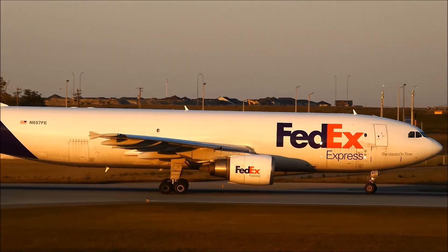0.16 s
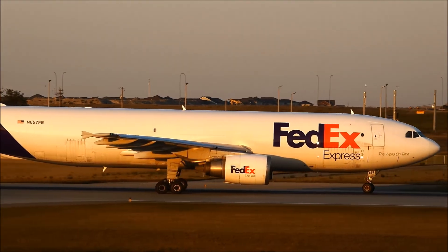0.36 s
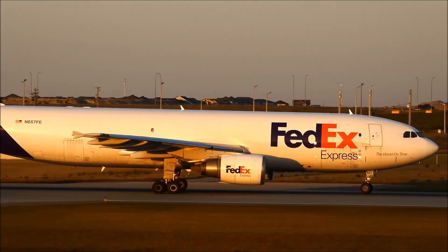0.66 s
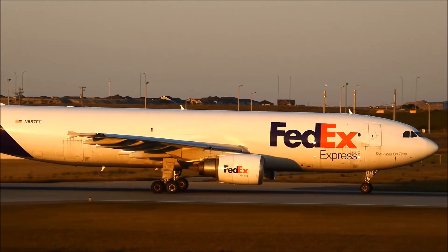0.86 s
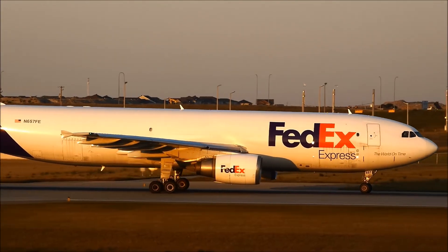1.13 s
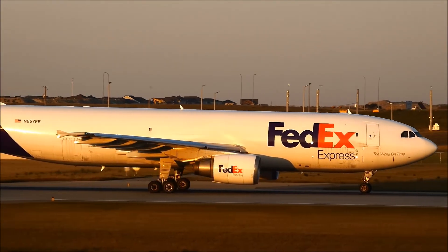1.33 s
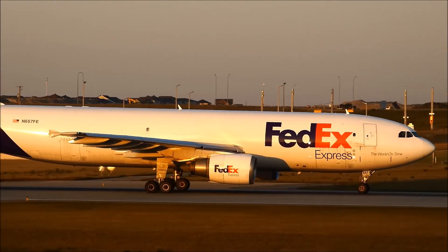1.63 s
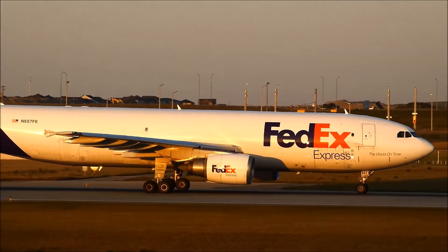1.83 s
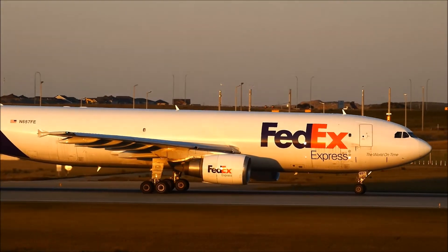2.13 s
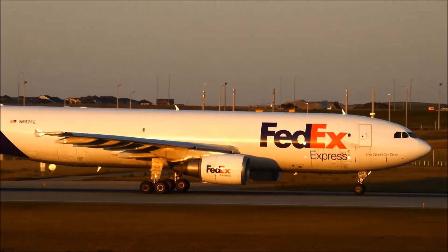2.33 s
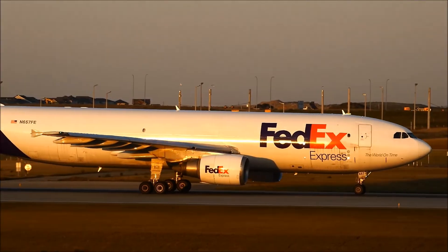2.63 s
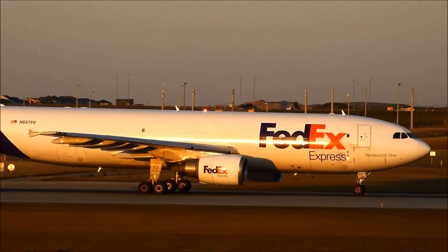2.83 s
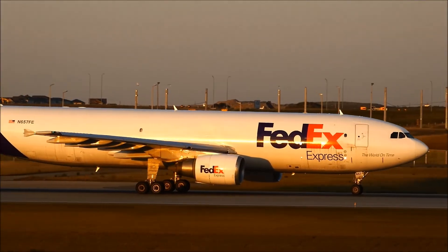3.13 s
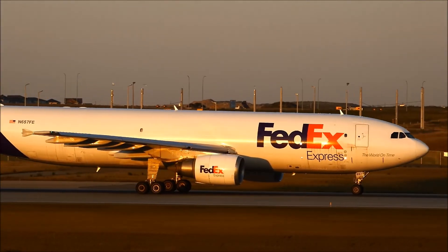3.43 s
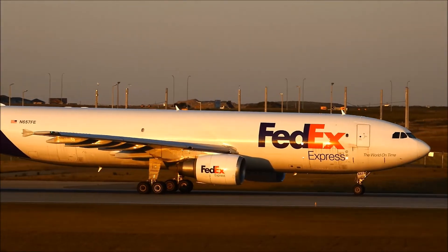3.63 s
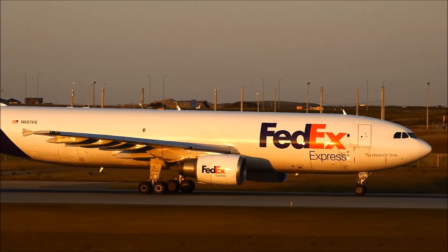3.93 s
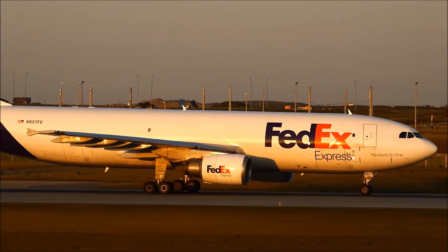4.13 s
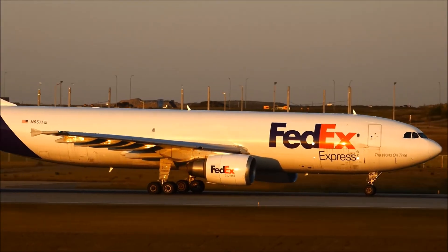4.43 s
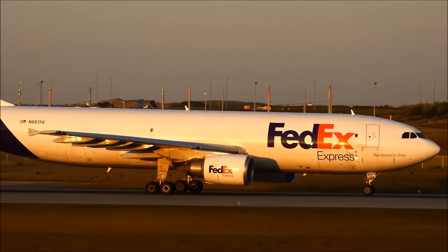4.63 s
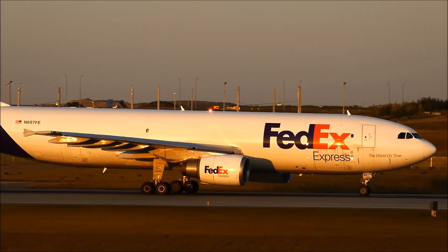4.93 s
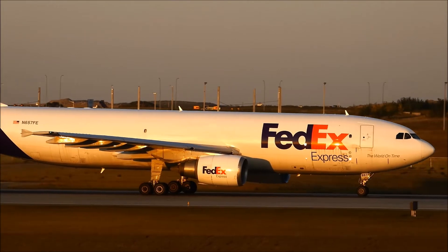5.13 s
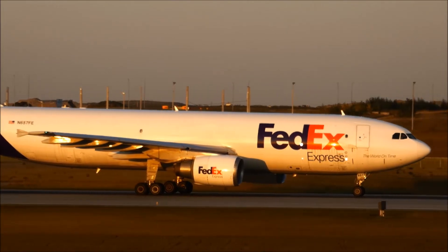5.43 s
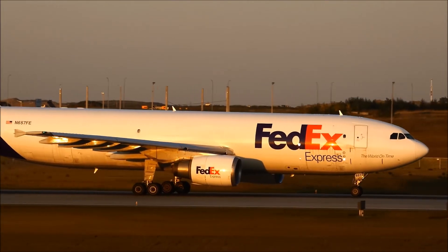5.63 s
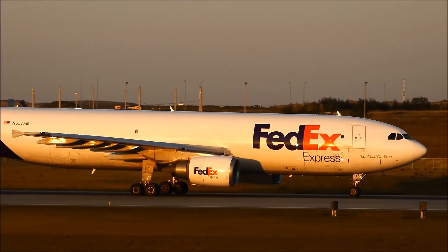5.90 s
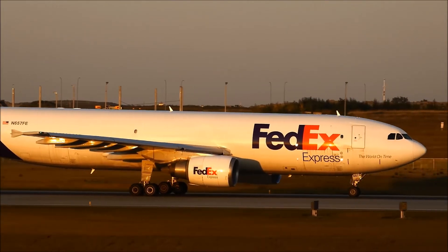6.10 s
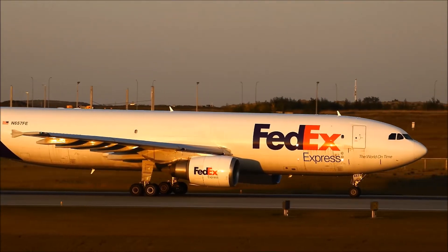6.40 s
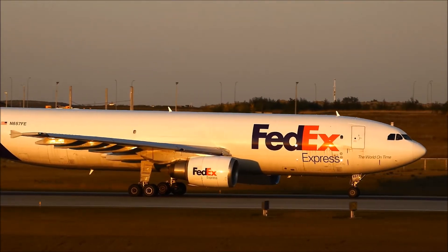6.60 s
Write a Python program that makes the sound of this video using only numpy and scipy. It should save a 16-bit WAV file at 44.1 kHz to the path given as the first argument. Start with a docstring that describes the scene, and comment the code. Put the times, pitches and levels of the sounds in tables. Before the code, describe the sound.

Across an open grass field, a large jet rolls along with a low trembling howl over steady exhaust roar and airy intake rush. The howl dips and swells, and the rush and fan hiss build through the middle. Near the end the pitch jumps up and keeps climbing with thin rising whines. Very faint crickets trill close to the stereo microphone, then hush.

```python
"""The low combustor howl of a large twin-engined jet, far across a grass field at dusk, drifts and then climbs.
The howl is a trembling sine; thin glides mark an engine gaining speed. Under it lie exhaust roar, intake rush
and fan hiss: noise shaped by spectra dulled by distance, which change colour as the jet rolls past.
Near the microphone bush crickets trill in pulsed treble noise and dry rustles tick.
A deep murmur from afar and quiet evening air, both steady noise, fill the background."""
import sys
import numpy as np
from scipy import signal
from scipy.fft import rfft, irfft, next_fast_len
from scipy.io import wavfile
from scipy.ndimage import uniform_filter1d, map_coordinates

SR = 44100
rng = np.random.default_rng(int(sys.argv[2]) if len(sys.argv) > 2 else 0)


def waveform_to_disk(signal):
    """Save audio, clipped to [-1, 1], as 16-bit WAV at the path in sys.argv[1]."""
    frames = np.transpose(np.atleast_2d(signal))
    scaled = np.clip(frames, -1, 1) * 32767
    samples = np.round(scaled).astype(np.int16)
    wavfile.write(sys.argv[1], SR, samples)


N = 298097

# Spectra give the colour only; their sound is scaled to rms 1 before its level is set.
# Deep murmur from afar. Each row: frequency in Hz, relative level in dB per Hz.
MURMUR_SPECTRUM = [(10, -120), (25, -19), (45, -13.5), (70, -3), (110, -12.5), (160, -120)]
# Quiet evening air over the field. Each row: frequency in Hz, relative level in dB per Hz.
AIR_SPECTRUM = [(4000, -120), (4900, -13.5), (5300, -1.5), (6000, -1), (8300, -2.5), (9500, 1),
                (11000, -0.5), (13000, -8), (15000, -10.5), (16000, -19)]

# Far cricket chorus. Each row: frequency in Hz, relative level in dB per Hz.
CHORUS_SPECTRUM = [(7500, -120), (8400, -14), (8900, -5), (9600, 0), (10400, -1), (11200, -4), (12000, -10),
                   (13000, -5), (14200, -11), (15000, -13), (16000, -40)]
# Cricket singing near the microphone. Each row: frequency in Hz, relative level in dB per Hz.
SINGER_SPECTRUM = [(8500, -120), (9400, -16), (9700, -9), (10100, -10), (10900, -2), (11400, -4),
                   (11950, -18), (12400, -4), (12800, -1), (13500, 0), (14150, -16), (14600, -11),
                   (15100, -10), (15600, -30)]
# Near singer over time, before flutter and left-right balance. Each row: time in seconds, level in dB.
SINGER_LEVEL = [(0, -85.5), (1.05, -81), (1.4, -70), (1.8, -72), (2.3, -67.5), (2.8, -72.5), (3.2, -69.5),
                (3.6, -69), (4.2, -64), (4.41, -67.5), (4.75, -62), (5.2, -66), (6.1, -69), (6.14, -86.5),
                (6.76, -87)]
# Stereo width of the crickets. Each row: frequency in Hz, left-right likeness from -1 to 1.
INSECT_LIKENESS = [(9000, .78), (14000, .81)]
CHORUS_DB, HUSH_S, HUSH_DB = -73, 6.12, -11  # the far chorus drops as the near singer stops
# The singer's wing tires: starting rate, its slowing, and the strokes done at the start.
STROKES_PER_S, SLOWING_PER_S2, FIRST_STROKE = 14.7675, .125, .34
# Faint dry rustles close by. Each row: peak time in seconds, level in dB, time to fall to 1/e in seconds.
RUSTLES = [(6.37, -68, .008), (6.69, -71, .014), (6.725, -71, .018)]

# How far the jet has turned. Each row: time in seconds, share of the intake sound heard side-on from 0 to 1.
SIDE_ON_SHARE = [(0, 0.46), (1, 0.18), (4, 0.01), (5.5, 0.31), (6.1, 0.7), (6.4, 0.7), (6.55, 1),
                 (6.76, 0.91)]
# Intake over time. Each row: time in seconds, fan control level in dB, rush level in dB.
INTAKE_LEVELS = [(0, -56, -44.5), (0.9, -57.5, -46.5), (1.15, -57, -42.5), (1.56, -56.5, -41.5),
                 (1.86, -52.5, -38), (2, -56.5, -43), (2.6, -57.5, -42.5), (2.8, -54.5, -38.5),
                 (3.13, -52, -38), (3.63, -51, -38.5), (4.05, -47.5, -33.5), (4.6, -49, -38),
                 (4.84, -44.5, -31), (5.5, -45, -32.5), (6.25, -46.5, -36), (6.76, -46, -47)]
# Intake colours, each a pair: ahead, side-on. Each row: frequency in Hz, relative level in dB per Hz.
BODY_SPECTRA = ([(800, -120), (870, -1.5), (963, 5), (1140, 6), (1320, -4), (1460, 5), (1650, 2.5),
                (1760, -5.5), (1900, -20.5), (2100, -120)], [(800, -120), (870, -5), (950, -6), (1110, -2),
                (1300, -8), (1480, -2), (1680, -16.5), (1780, -11.5), (1900, -22), (2100, -120)])
RUSH_SPECTRA = ([(1450, -120), (1620, -26), (1760, -14), (1940, -1), (2200, 0), (2350, -1), (2420, -9),
                (2520, -13), (2580, -28), (2700, -120)], [(1450, -120), (1620, -30), (1760, -12), (1950, 0),
                (2150, -6), (2300, -12), (2450, -22), (2550, -26), (2700, -120)])
FAN_SPECTRA = ([(2500, -120), (2600, -18), (2680, -12), (2860, -12), (3000, -6), (3100, 0), (3300, -5),
               (3450, -6), (3600, -5), (3780, -12), (3900, -120)], [(2450, -120), (2560, -10), (2680, -2),
               (2900, -4), (3120, 0), (3450, -6), (3650, -18), (3800, -20), (3900, -120)])
HISS_SPECTRA = ([(3650, -120), (3780, 0), (3980, -9), (4180, -4), (4400, -17), (4520, -27), (4750, -31),
                (4900, -17), (5300, -24), (5600, -34), (6500, -120)], [(3650, -120), (3780, -2), (4000, 0),
                (4150, -5), (4550, 0), (4800, -10), (5100, -13), (5400, -15), (5700, -24), (6500, -120)])
# Body, fan and hiss, in that order. Each row: base level in dB at a loud fan,
# growth in dB per dB of the fan, change in dB when fully side-on.
INTAKE_REGISTERS = [(-35, 0.85, -3), (-44, 1, -1), (-62.5, 0.66, -1)]
LOUD_FAN_DB = -45  # fan control level at which the registers have their base level
# Faint compressor tones. Each row: frequency in Hz, width in Hz, full level in dB, start and end in seconds.
COMPRESSOR_TONES = [(825, 14, -47, 0, 6.5), (2490, 14, -60, .8, 5.2), (2210, 12, -47, 4.5, 5.9),
                    (2750, 8, -59, 4.3, 5.7), (3762, 8, -63, 4.1, 5.7), (4605, 25, -87, 1, 6)]

# Rumble of the exhausts. Each row: frequency in Hz, relative level in dB per Hz.
RUMBLE_SPECTRUM = [(10, -120), (30, -51), (50, -35), (86, -12), (118, -16), (162, -4.5), (230, -3),
                   (270, -2.5), (310, -5), (360, -120)]
# Drone of the exhausts. Each row: frequency in Hz, relative level in dB per Hz.
DRONE_SPECTRUM = [(170, -120), (230, -26), (262, -16), (285, -6), (310, -6), (350, 1), (400, 0), (460, -8),
                  (520, -17), (600, -120)]
# Roar, a pair: ahead, side-on. Each row: frequency in Hz, relative level in dB per Hz.
ROAR_SPECTRA = ([(340, -120), (400, -8.5), (450, -6.5), (490, -2), (545, 1.5), (680, -3), (790, -4),
                (845, -8.5), (930, -22.5), (1000, -120)], [(340, -120), (400, -7), (450, -8), (570, 2),
                (650, -0.5), (720, -13), (830, -18), (930, -27), (1000, -120)])
# Roar over time. Each row: time in seconds, level in dB.
ROAR_LEVEL = [(0, -28.5), (0.9, -36), (1.4, -33.5), (2.3, -28.5), (2.9, -33.5), (3.8, -28.5), (4.6, -26),
              (5.0, -26.5), (5.48, -27), (5.57, -21.5), (5.85, -21), (6.1, -23.5), (6.76, -28.5)]
# Faint narrow hum. One row: frequency in Hz, width in Hz, level in dB over the drone.
EXHAUST_HUM = (128, 6.8, -23.5)
RUMBLE_START_DB, RUMBLE_DB_PER_S = -53, 2  # grows steadily as the exhausts swing round
DRONE_START_DB, DRONE_DB_PER_S, DRONE_SIDE_ON_DB = -34, 1.735, -7.5  # grows too, but sinks side-on
GUSTS_DB, GUSTS_PER_S = 1, 5  # rumble and drone each swell on their own

# Thin whines that climb. Each row: start and end in seconds, first and last frequency in Hz,
# level in dB before flutter and the fade in and out.
SPOOL_WHINES = [(5.946, 6.495, 2410, 2710, -57), (6.101, 6.605, 2890, 3010, -62)]
# Pitch of the combustor howl. Each row: time in seconds, frequency in Hz.
HOWL_HZ = [(0, 382.5), (1.5, 379.4), (2.1, 384.2), (3.2, 383.7), (3.6, 382), (3.9, 387.4), (4.3, 390.3),
           (4.6, 387.5), (4.8, 380.8), (5.1, 377.7), (5.44, 382.9), (5.54, 405.2), (6.1, 421), (6.5, 430),
           (6.76, 431)]
# Howl as it fades in the moving air. Each row: time in seconds, level in dB before flutter.
HOWL_DB = [(0, -24), (0.25, -24.5), (0.29, -34.5), (0.6, -29), (0.96, -23.5), (1.32, -22), (1.56, -32),
           (1.8, -32), (1.92, -44.5), (2.04, -28), (2.18, -18), (2.55, -15), (3.12, -17), (3.6, -19),
           (3.98, -23), (4.32, -17.5), (4.54, -28), (5.04, -21.5), (5.16, -24.5), (5.42, -20.5),
           (5.5, -26.5), (5.57, -22.5), (5.78, -25), (5.9, -26), (6.12, -17.5), (6.3, -19.5), (6.76, -16)]
# Overtones of the howl. Each row: multiple of the pitch, level in dB over the whine control.
HOWL_OVERTONES = [(6, 0), (7, -11), (8, -15)]

# Likeness of the jet noise at the two microphone ports. Each row: frequency in Hz, likeness from -1 to 1.
PORT_LIKENESS = [(60, 0.99), (110, 1), (190, 0.98), (350, 0.99), (620, 1), (1110, 0.93), (1990, 1),
                 (3560, 0.95)]
# Balance of the ports. Each row: frequency in Hz, left minus right in dB.
PORT_TILT = [(60, -.5), (230, -.5), (580, -.7), (910, -1.5), (1440, -2.5), (2260, -.5), (3560, -1)]
# Phase between the ports. Each row: frequency in Hz, lead of the left in radians.
PORT_LEAD = [(0, 0.08), (860, -0.13), (1810, 0.1), (2500, -0.59), (2760, 0.1), (3700, -0.22)]
TOP_HZ = 15500  # band limit of the microphone channel


def amp(db):
    """Decibels to gain."""
    return 10 ** (np.asarray(db) / 20)


def unit(x):
    """Scale to rms 1."""
    return x / np.sqrt(np.mean(x ** 2) + 1e-20)


def along(points, hz):
    """Read (Hz, value) points on a log frequency axis."""
    f, v = np.transpose(points)
    return np.interp(np.log(hz + 1), np.log(f + 1), v)


def curves(rows):
    """One value per sample for each column after the time."""
    seconds, *columns = np.transpose(rows)
    t = np.arange(N) / SR
    return [np.interp(t, seconds, column) for column in columns]


def wobble(rate):
    """A smooth random curve with rate knots a second."""
    knots = rng.standard_normal(int(N * rate / SR) + 4)
    return map_coordinates(knots, [np.arange(N) * rate / SR])


def filtered(x, response):
    """Multiply the spectrum of x by a complex response of frequency."""
    size = next_fast_len(N + 8192)
    hz = np.fft.rfftfreq(size, 1 / SR)
    return irfft(rfft(x, size) * response(hz), size)[..., :N]


def patchy(patchy_db):
    """Two white noises that share patches of random gain: turbulent air along the path."""
    bins = signal.stft(rng.standard_normal((2, N)), nperseg=512)[2]
    field = rng.standard_normal(bins.shape[1:])
    field = uniform_filter1d(field, size=5, axis=0)  # smooth across frequency
    field = uniform_filter1d(field, size=16, axis=1)  # smooth across time
    return signal.istft(bins * amp(patchy_db * unit(field)), nperseg=512)[1][:, :N]


def coloured(noise, spectrum):
    """Noise shaped by a spectrum, rms 1."""
    return unit(filtered(noise, lambda hz: amp(along(spectrum, hz))))


def narrow(pair, hz, width):
    """A fuzzy tone: noise through one sharp resonance, rms 1."""
    return unit(filtered(pair, lambda f: 1 / (1 + ((f - hz) / width) ** 2)))


def turning(pair, spectra):
    """Noise whose colour crossfades as the aircraft turns side-on."""
    side_on = np.clip(curves(SIDE_ON_SHARE)[0], 0, 1)
    ahead_sound = (1 - side_on) * coloured(pair, spectra[0])
    return ahead_sound + side_on * coloured(pair, spectra[1])


def spread(pair, likeness):
    """Left and right from a shared and an opposed noise, mixed to the wanted likeness."""
    def mid_side(hz):
        angle = np.arccos(np.clip(along(likeness, hz), -1, 1)) / 2
        return np.array([np.cos(angle), np.sin(angle)])

    mid, side = filtered(pair, mid_side)
    return np.array([mid + side, mid - side])


def far_murmur():
    """Steady deep noise from afar, wide between left and right."""
    noise = coloured(patchy(patchy_db=1.5), MURMUR_SPECTRUM)
    return amp(-66.5) * spread(noise, [(50, 0.65)])


def evening_air():
    """Faint steady treble noise of the open field, in random patches."""
    noise = coloured(patchy(patchy_db=2.5), AIR_SPECTRUM)
    return amp(-78) * spread(noise, [(6000, 1.0), (12000, 0.93)])


def crickets():
    """Smooth far chorus, and a near singer whose wing strokes swell and stop short over a weaker steady trill."""
    t = np.arange(N) / SR
    stroke = (FIRST_STROKE + STROKES_PER_S * t - SLOWING_PER_S2 * t ** 2 / 2) % 1
    rise, stop = np.clip(stroke / .36, 0, 1), np.clip((.8 - stroke) / .11, 0, 1)
    swell = rise * stop + .36  # never silent between strokes
    chorus_db = CHORUS_DB + HUSH_DB * (t > HUSH_S)
    chorus = amp(chorus_db) * coloured(patchy(patchy_db=0.0), CHORUS_SPECTRUM)
    singer_db = curves(SINGER_LEVEL)[0] + 2.0 * wobble(9)
    singer = amp(singer_db) * unit(swell) * coloured(patchy(patchy_db=2.5), SINGER_SPECTRUM)
    return spread(chorus + singer, INSECT_LIKENESS) * amp([[.85], [-.85]])  # stronger on the left


def rustles():
    """Short soft bursts of treble noise close by, each with a bell-shaped envelope."""
    t = np.arange(N) / SR
    burst = sum(amp(db) * np.exp(-((t - peak) / length) ** 2) for peak, db, length in RUSTLES)
    spectrum = [(4000, -120), (5000, 0), (6400, -4), (7500, -14), (9000, -120)]  # Hz, relative dB per Hz
    return burst * coloured(rng.standard_normal(N), spectrum)


def intake():
    """Fan and compressor noise in four registers, three swelling together, with thin tones that come and go."""
    air, t = patchy(patchy_db=1.23), np.arange(N) / SR
    fan_db, rush_db = curves(INTAKE_LEVELS)
    swell_db, side_on = fan_db - LOUD_FAN_DB, curves(SIDE_ON_SHARE)[0]
    sound = amp(rush_db) * turning(air, RUSH_SPECTRA)
    colours = (BODY_SPECTRA, FAN_SPECTRA, HISS_SPECTRA)
    for (base_db, grows, side_db), spectra in zip(INTAKE_REGISTERS, colours):
        level_db = base_db + grows * swell_db + side_db * side_on + 0.72 * wobble(6)
        sound += amp(level_db) * turning(air, spectra)
    for hz, width, db, start, end in COMPRESSOR_TONES:
        fade = np.clip(np.minimum(t - start, end - t) / 0.9, 0, 1)  # 0.9 s in and out
        sound += amp(db) * fade * narrow(air, hz, width)
    return sound


def exhaust():
    """Jet mixing noise in three registers, rumble, drone and roar, with a faint hum in the rumble."""
    air, t = patchy(patchy_db=0.5), np.arange(N) / SR
    rumble_db = RUMBLE_START_DB + RUMBLE_DB_PER_S * t + GUSTS_DB * wobble(GUSTS_PER_S)
    drone_db = DRONE_START_DB + DRONE_DB_PER_S * t + GUSTS_DB * wobble(GUSTS_PER_S)
    drone_db += DRONE_SIDE_ON_DB * curves(SIDE_ON_SHARE)[0]
    hum_hz, hum_width, hum_db = EXHAUST_HUM
    rumble = amp(rumble_db) * coloured(air, RUMBLE_SPECTRUM)
    hum = amp(drone_db + hum_db) * narrow(air, hum_hz, hum_width)
    drone = amp(drone_db) * coloured(air, DRONE_SPECTRUM)
    roar = amp(curves(ROAR_LEVEL)[0]) * turning(air, ROAR_SPECTRA)
    return rumble + hum + drone + roar


def spool_up():
    """Short whines gliding upward as an engine gains speed."""
    t, sound = np.arange(N) / SR, 0
    for start, end, low_hz, high_hz, db in SPOOL_WHINES:
        way = np.clip((t - start) / (end - start), 0, 1)
        phase = 2 * np.pi * np.cumsum(low_hz + (high_hz - low_hz) * way) / SR
        level = amp(db + 3 * wobble(21)) * np.sin(np.pi * way)
        sound = sound + level * np.sin(phase + wobble(36))
    return sound


def howl():
    """The combustor sings one trembling tone; a few overtones whine faintly until the intake turns away."""
    phase = 2 * np.pi * np.cumsum(curves(HOWL_HZ)[0]) / SR
    tremble = .22 * wobble(14)  # radians
    flutter_db = 1.5 * wobble(13)
    tone = amp(curves(HOWL_DB)[0] + flutter_db) * np.sin(phase + tremble)
    whine_db = curves(INTAKE_LEVELS)[0] - 40 * curves(SIDE_ON_SHARE)[0]
    whine = 0
    for multiple, over_db in HOWL_OVERTONES:
        level = amp(whine_db + over_db + 4 * wobble(5.2))
        whine = whine + level * np.sin(multiple * phase + 2.5 * wobble(9))
    return np.sqrt(2) * (tone + whine)  # levels count as rms


def at_ports(jet):
    """The jet at the two microphone ports, which differ in level and phase along the spectrum."""
    half = np.array([[.5], [-.5]])  # half of each difference to either side

    def response(hz):
        return amp(half * along(PORT_TILT, hz)) * np.exp(1j * half * along(PORT_LEAD, hz))

    return filtered(jet, response)


def scene():
    """The far aircraft as the two microphone ports hear it, with the field around."""
    background = far_murmur() + evening_air()
    nearby = crickets() + rustles()
    jet = spread(intake() + exhaust(), PORT_LIKENESS) + spool_up() + howl()
    return background + nearby + at_ports(jet)


def record(dry):
    """The microphone channel keeps nothing above its band limit."""
    return filtered(dry, lambda hz: hz < TOP_HZ)


dry = scene()
out = record(dry)
waveform_to_disk(out)
```